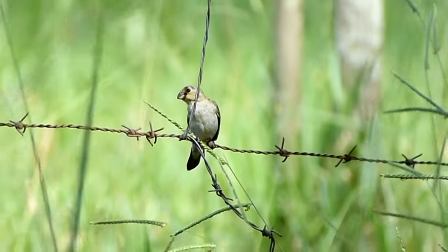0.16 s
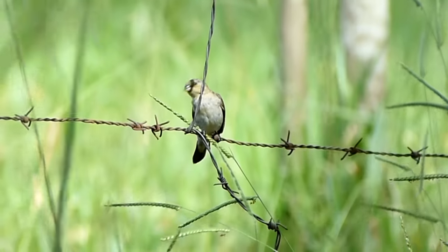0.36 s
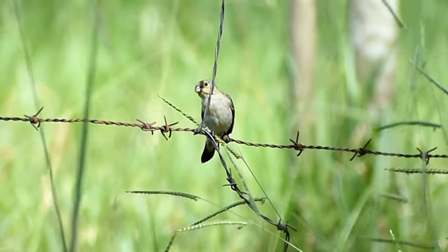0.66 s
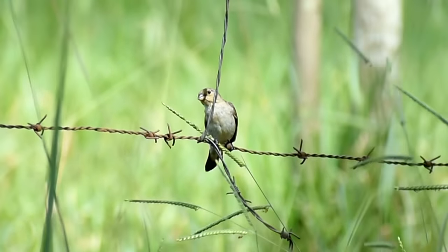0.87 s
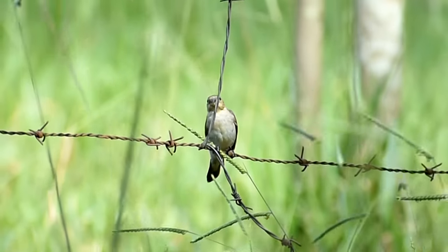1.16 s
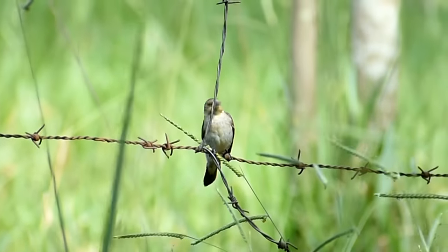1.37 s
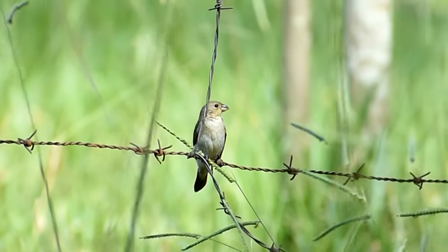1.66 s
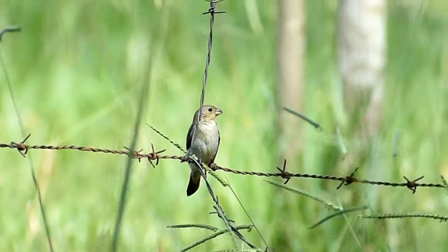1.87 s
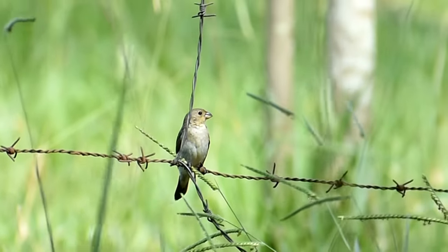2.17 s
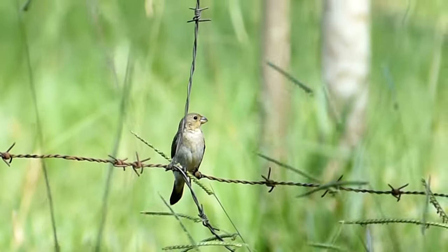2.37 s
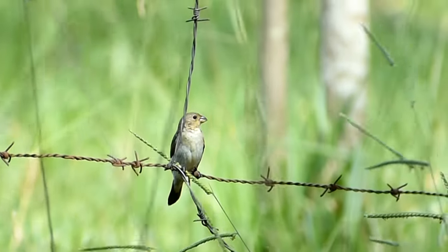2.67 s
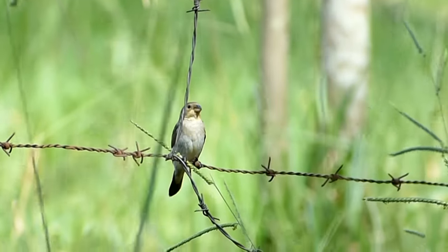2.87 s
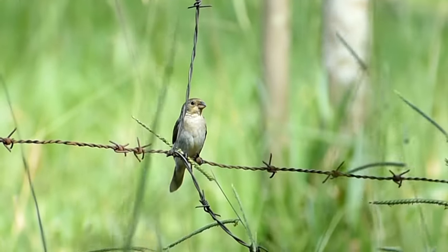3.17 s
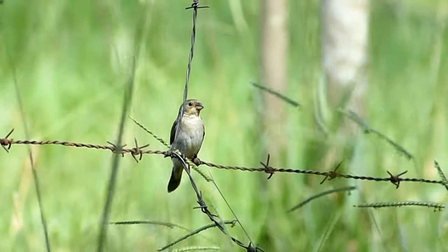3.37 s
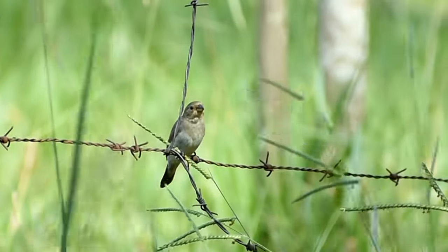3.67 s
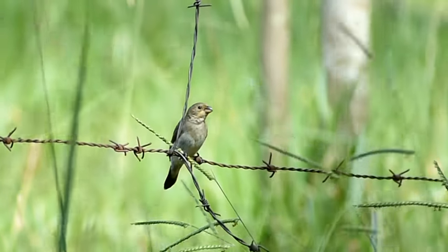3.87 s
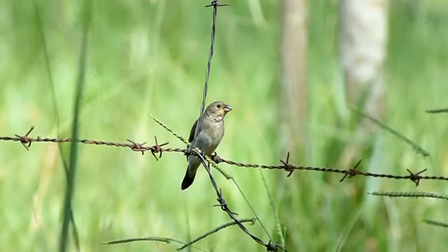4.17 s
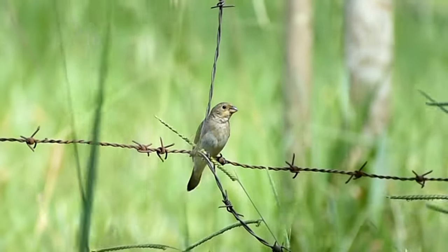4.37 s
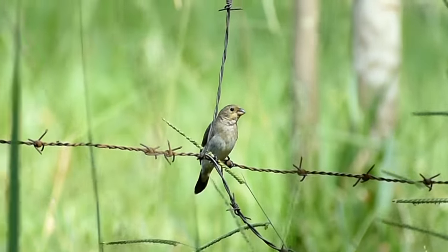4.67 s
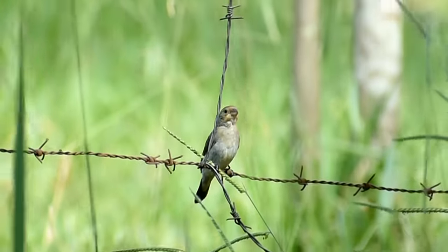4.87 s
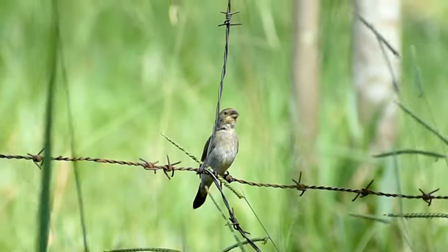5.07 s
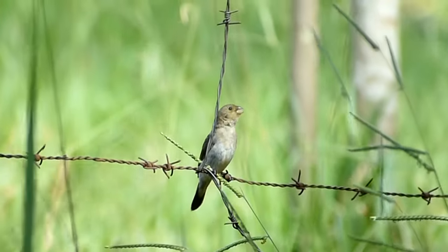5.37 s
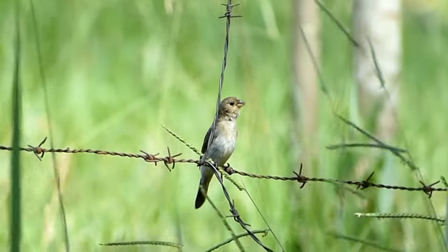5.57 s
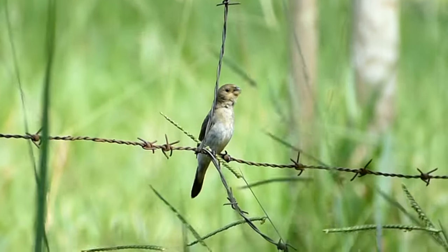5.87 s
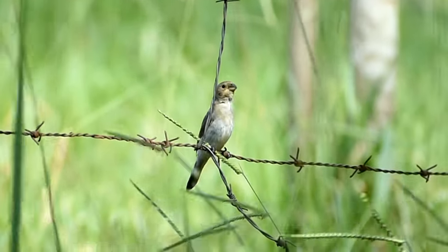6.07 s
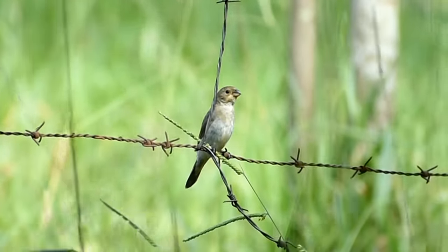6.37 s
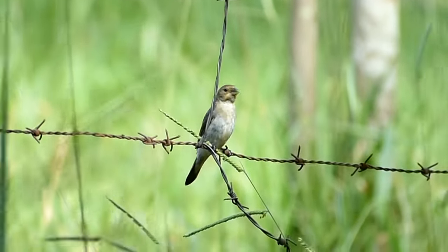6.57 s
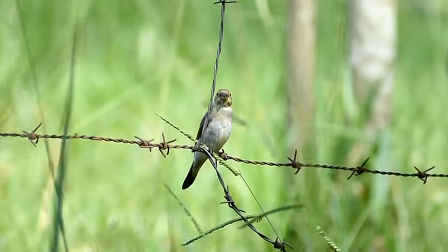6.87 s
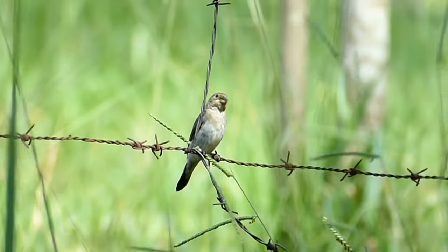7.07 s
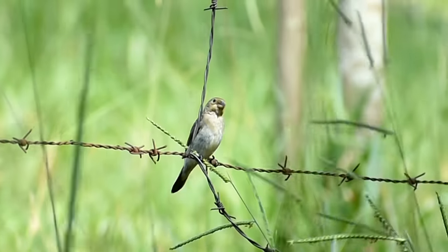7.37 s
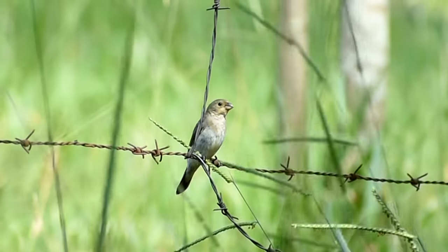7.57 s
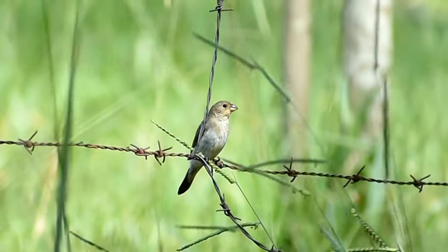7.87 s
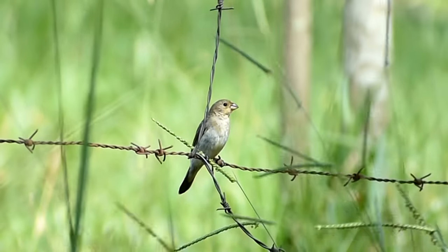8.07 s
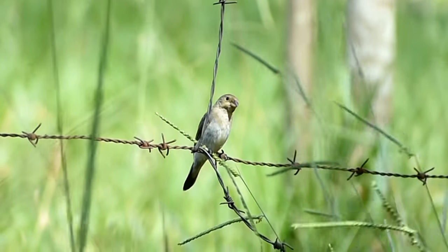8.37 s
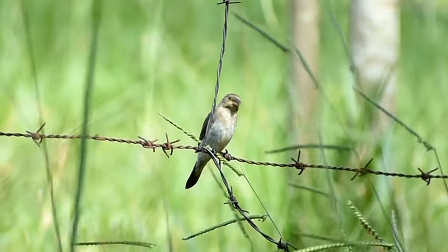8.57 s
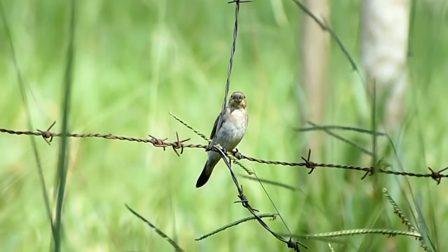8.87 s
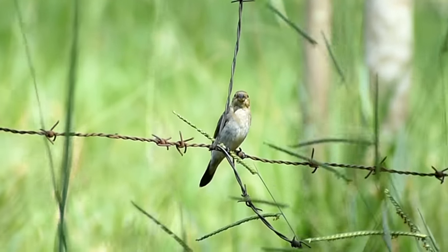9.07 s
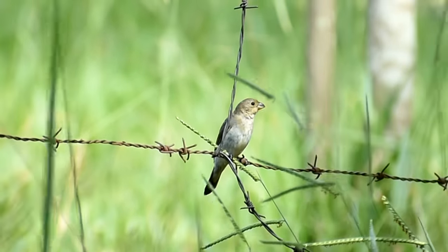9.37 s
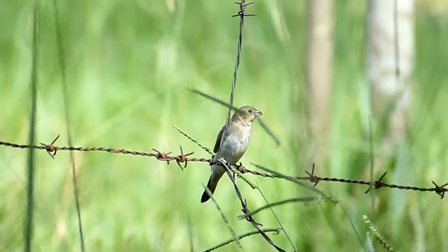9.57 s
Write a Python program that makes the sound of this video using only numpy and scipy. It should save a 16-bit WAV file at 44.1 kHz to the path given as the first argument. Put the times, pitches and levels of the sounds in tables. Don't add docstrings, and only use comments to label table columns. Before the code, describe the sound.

Open grassland: short nasal bird notes, dry clicks and frog pips, then one bright rapid trill, cricket chirping and thin katydid ticks.

```python
import sys
import numpy as np
from scipy import signal
from scipy.fft import rfft, irfft, next_fast_len
from scipy.io import wavfile
from scipy.ndimage import uniform_filter1d, map_coordinates

SR = 44100
rng = np.random.default_rng(int(sys.argv[2]) if len(sys.argv) > 2 else 0)


def inscribe(sig):
    pcm = np.round(np.clip(np.atleast_2d(sig).T, -1, 1) * 32767)
    wavfile.write(sys.argv[1], SR, pcm.astype(np.int16))


def rack_gain(trim_db):
    fader = np.asarray(trim_db, float)
    return 10 ** (fader / 20)


N = 428211

# (start [s], first pitch [Hz], fall time [s], upward flick [Hz], level [dB])
TRILL = [(5.054, 4500, 0.032, 50, -48.5), (5.112, 4360, .035, 200, -52), (5.196, 4540, 0.027, 50, -35.5),
         (5.254, 4400, 0.041, 200, -41.5), (5.342, 4620, .026, 50, -32.5), (5.396, 4620, 0.041, 250, -37.5),
         (5.493, 4570, 0.024, 50, -28.5), (5.545, 4490, 0.042, 248, -32.5), (5.649, 4580, 0.026, 50, -28),
         (5.703, 4590, .045, 250, -31.5), (5.807, 4620, .03, 100, -28), (5.888, 4740, 0.038, 607, -29),
         (5.955, 4670, 0.043, 573, -28.5), (6.031, 4680, 0.04, 710, -27.5),
         (6.091, 4600, 0.044, 495, -30.5)]
# (start [s], level [dB])
STUTTER = [(5.187, -46), (5.331, -45), (5.335, -38), (5.47, -48), (5.478, -42), (5.485, -32.5),
           (5.631, -38), (5.64, -29), (5.782, -42), (5.79, -33.5), (5.8, -34)]
# (centre [Hz], width [Hz], level [dB])
BEAK_MODES = [(3263, 160, 1.5), (3760, 123, 3), (3980, 190, -1.5), (4270, 240, 1), (4850, 490, -6)]
# (delay [s], level [dB])
POST_ECHOES = [
    (.0075, -18),
    (0.0153, -24),
    (0.025, -16),
]

# (start [s], length [s], top pitch [Hz], level [dB], pitch sag at the ends [share])
NASAL_CALLS = [(0.446, 0.077, 747, -46, 0.012), (1.048, 0.083, 711, -49, 0.058),
               (1.323, 0.074, 710, -47, 0.065), (1.544, 0.066, 652, -51, 0.059),
               (1.79, 0.081, 725, -50, 0.13), (2.015, 0.058, 735.5, -35, 0.13),
               (2.211, 0.077, 712, -41.5, 0.17), (2.499, 0.093, 694, -47, 0.092),
               (2.709, 0.081, 709, -46.5, .07), (2.952, 0.097, 681, -46, 0.083),
               (3.187, 0.087, 692, -42.5, 0.093), (3.428, .19, 698, -47, 0.04),
               (3.581, 0.14, 680, -48.5, 0.029), (3.7, 0.098, 688, -42.5, 0.031),
               (3.952, 0.086, 678, -47.5, 0.031), (5.04, 0.06, 690, -52, 0.032)]
# (mouth resonance [Hz], moment of the top [share], roughness [0-1])
NASAL_MANNER = [(4060, .55, .3), (3200, .55, .5), (3300, .55, .4), (3200, .55, .5), (2900, .6, .55),
                (3250, .66, .05), (3400, .72, .1), (3380, .6, .6), (2900, .5, .4), (3300, .55, .55),
                (3740, .6, .35), (3900, .3, .4), (3500, .5, .5), (3800, .35, .45), (3800, .5, .45),
                (3500, .55, .55)]
# (frequency [Hz], level [dB])
THROAT = [(1500, -60), (2400, -10), (2900, 5.5), (3600, 0.5), (4300, 1), (5200, 2.5), (6600, -5),
          (8000, -33), (10000, -73), (14000, -79)]
# (start [s], length [s], first pitch [Hz], level [dB])
CHURR = [
    (0.518, 0.057, 3440, -45),
    (0.57, 0.064, 3230, -45.5),
    (0.637, .03, 2954, -44),
    (.662, .032, 2900, -39.5),
    (0.704, 0.05, 3020, -49),
]
# (multiple of the pulse rate, level [dB])
CHURR_PARTIALS = [(3, 7), (4, -13), (5, -9), (6, -11), (7, -25), (8, -25)]
# (frequency [Hz], density [dB per Hz])
SPRAY_SPECTRUM = [(2240, -7), (3800, -1), (4860, -3.5), (5270, -4), (7350, -8), (9070, -28), (10000, -26),
                  (13000, -53), (22000, -120)]
SPRAY_TIMES = (.49, .54, .66, .76)

# (time from start [s], pitch [Hz], level [dB])
SLIDE_HIGH = [(0, 9900, -11), (0.024, 8050, -3), (.034, 7830, 1.5), (.054, 7000, 1), (.068, 7250, -4),
              (.092, 6500, -1)]
SLIDE_LOW = [(0, 8170, 1), (.02, 6840, -3.5), (.036, 6740, -9), (.052, 6300, 9)]
# (start [s], delay of low voice [s], high level [dB], low level [dB])
SLIDES = [
    (0.402, 0, -51, -50.5),
    (5.648, .006, -57, -50.5),
    (6.822, 0.013, -57, -50),
]
# (start [s], length [s], first pitch [Hz], last pitch [Hz], level [dB])
GLIDES = [
    (.045, .08, 5390, 4260, -61),
    (.895, 0.063, 5400, 4250, -57),
    (2.47, 0.054, 7400, 7750, -63),
    (3.57, 0.067, 6450, 6950, -53.5),
    (.634, 0.026, 7660, 7550, -54),
    (1.544, .016, 4000, 4550, -53),
    (6.125, .03, 7550, 7400, -64),
]
# (start [s], length [s], pitch at the ends [Hz], pitch halfway [Hz], level [dB])
BOWS = [
    (4.16, 0.083, 4270, 4600, -58.5),
    (6.037, 0.084, 7500, 6950, -54.5),
]

# (from [s], to [s], level [dB])
DEEP_FROG_BOUTS = [
    (0, 3.5, -58),
    (.38, 0.478, -48),
    (1.44, 1.71, -56),
    (1.72, 1.92, -51.5),
    (2.38, 2.45, -62),
    (4.55, 5.1, -61),
    (5.15, 6.2, -59),
    (5.2, 5.4, -53.5),
    (5.8, 5.95, -53),
]
LOW_FROG_BOUTS = [
    (0, 0.37, -53),
    (.5, 3.1, -59),
    (3.18, 3.3, -49),
    (4.5, 4.67, -56),
    (4.68, 4.8, -57),
    (4.82, 5.06, -57),
    (5.06, 5.15, -60),
    (5.15, 6.15, -54),
    (6.19, 9.3, -44.5),
]
HIGH_FROG_BOUTS = [
    (0, .4, -53.5),
    (.45, 1, -55),
    (1, 2.5, -55),
    (2.5, 2.68, -51),
    (2.68, 2.9, -53),
    (2.9, 3.3, -55),
    (4.6, 5.1, -65.5),
    (5.12, 5.75, -51.5),
    (5.75, 6.3, -49.5),
]
NEAR_CRICKET_BOUTS = [
    (4.1, 4.26, -59),
    (4.85, 4.96, -53.5),
    (4.96, 5.04, -51),
    (5.08, 6.3, -55),
    (6.3, 6.65, -57),
    (6.65, 6.9, -53),
    (6.93, 7.14, -46.5),
    (7.14, 7.25, -47),
]
FAR_CRICKET_BOUTS = [
    (4.4, 4.6, -77),
    (4.68, 4.82, -59),
    (4.82, 5.1, -58),
    (5.1, 6.3, -53.5),
    (6.3, 6.62, -57.5),
    (6.62, 7.18, -51),
]
# (time [s], peak [dB], pitch [Hz])
SHARP_PIPS = [(0.2119, -36, 2300), (0.2443, -33, 2400), (0.3027, -36, 2400), (0.3845, -35, 2150),
              (0.4564, -32, 2080), (0.5252, -37, 2480), (1.7434, -31, 2120), (1.7784, -33.5, 2220),
              (1.8253, -34, 2210), (1.8721, -29, 2100), (2.1066, -53, 2480), (2.1525, -37, 2080),
              (2.2243, -33, 2480), (2.3401, -41, 2310), (2.6788, -39, 2500), (2.783, -39, 2520),
              (2.819, -37, 2830),
              (4.5514, -46, 2450), (4.6307, -42.5, 2360), (4.832, -41, 2246), (5.163, -42, 2650),
             (6.206, -39, 2280), (6.2175, -31, 2280), (4.6666, -56, 2240), (4.7005, -41, 2354),
             (4.7371, -43, 2610), (4.8185, -44, 2240), (4.9125, -66, 2160), (4.9564, -36, 2080),
             (5.0143, -39.5, 2420)]
# (time [s], peak [dB], pitch [Hz])
CRICKET_PIPS = [(4.9184, -50, 3290), (4.9287, -52, 3430), (4.9551, -52, 3420), (6.6139, -57, 3500),
                (6.6493, -50, 3660), (6.6817, -59, 3750), (6.6917, -47, 3370), (6.7321, -45, 3610),
                (6.7825, -49, 3220), (6.795, -51, 3670), (6.8059, -39, 3760), (6.8284, -47, 3500),
                (6.8523, -40, 3500), (6.9466, -44, 3380), (6.978, -52, 3400), (7.006, -47, 3550),
                (7.0354, -45, 3560), (7.0599, -39, 3500)]
FAR_PIPS = [
    (4.6104, -61, 4290),
    (4.6303, -65, 4610),
    (4.6742, -51, 4560),
    (4.7056, -49, 4400),
    (4.7151, -46, 4550),
    (4.753, -69, 4580),
    (4.775, -48, 4570),
    (4.7999, -60, 4380),
    (4.8578, -59, 4270),
]
FROG_PIPS = [
    (1.2431, -39, 2070),
    (1.3009, -38, 2110),
    (2.4678, -57, 2450),
    (2.5247, -47, 2920),
    (2.5636, -33.5, 2970),
    (2.711, -36, 2430),
    (2.8195, -38, 3000),
    (2.9502, -39, 2830),
]

# (time [s], peak [dB], main mode [Hz], overtones [dB], length [s])
KATYDID_TICKS = [(7.603, -43, 8200, -7.5, 0.024), (7.93, -42.5, 8550, -26, 0.042),
                 (8.205, -42.5, 8630, -16, 0.056), (8.474, -42, 8650, -13, 0.057),
                 (8.743, -41, 8650, -13, 0.041), (8.878, -47, 8440, -9.5, 0.032),
                 (8.986, -56, 8340, -8, 0.035), (9.044, -44, 8700, -4, 0.052),
                 (9.21, -31, 8700, -16, 0.019), (9.323, -43, 8850, -1, 0.049), (9.37, -48, 8180, -2, 0.039),
                 (9.494, -39, 8700, -3, 0.061), (9.587, -45, 8660, -2, 0.095)]
# (frequency [Hz], level [dB])
WING_MODES = [(11300, 4), (12500, 1.5), (13500, -3), (14600, -4), (15300, -11)]
# (time [s], peak [dB], bright part [dB])
SNAPS = [
    (0.8574, -23.5, -27),
    (1.252, -24, -22),
    (2.8194, -35, -30),
    (3.4444, -25, -30),
    (4.8578, -28, -22),
    (7.9228, -48, -14),
    (8.9944, -48, -24),
    (9.1904, -41, -28),
]

# (frequency [Hz], density [dB per Hz])
LOW_SPECTRUM = [(71, -79), (120, -63), (138, -37.5), (205, -11), (268, 1), (489, -8), (520, -5.5),
                (680, -27), (1140, -120)]
DRONE_SPECTRUM = [(310, -67.5), (520, -15), (567, -7.5), (650, -6.5), (820, -9), (1070, -18.5),
                  (1800, -120)]
MID_SPECTRUM = [(480, -42), (820, -6.5), (930, -3.5), (1210, 0.5), (1500, -7.5), (1910, -12.5), (1980, -64),
                (2570, -48), (4360, -120)]
# (frequency [Hz], density [dB per Hz])
AIR_SPECTRUM = [(1710, -23.5), (2900, -2.5), (3220, -5.5), (3840, -7.5), (4210, -1.5), (5060, -5.5),
                (7830, -9.5), (8470, -10), (9480, -11), (12700, -15), (15600, -19)]
# (time [s], level [dB])
RUMBLE = [
    (0, -52),
    (.27, -51),
    (.32, -54.5),
    (2, -55),
    (3.2, -54.5),
    (4.6, -54),
    (5.17, -51.5),
    (5.25, -55.5),
    (6.3, -56.5),
]
# (from [s], to [s], level [dB])
GUST = [
    (5.03, 5.16, -57.5),
]
# (frequency [Hz], correlation [0-1])
LIKENESS = [(200, 1), (500, 0.99), (1000, 0.89), (1600, 0.64), (2300, 0.53), (3500, 0.83), (5000, 0.25),
            (8000, 0.067), (12000, 0.041)]
# (frequency [Hz], 60 dB decay time [s])
FIELD_DECAY = [(1000, 0.26), (3000, 0.24), (5000, 0.38), (10000, 0.19)]

# (from [s], to [s])
LOW_REPEATS = [
    (3.246, 3.818),
    (3.818, 4.2267),
    (4.2267, 4.4106),
    (4.4106, 4.5595),
    (6.229, 6.842),
    (6.842, 7.1282),
]
# (from [s], to [s], source [s])
WIDE_REPEATS = [
    (7.1282, 7.8226, 4.2063),
    (7.8226, 8.5593, 4.206),
    (8.5593, 9.357, 4.2061),
    (9.357, 9.72, 4.1875),
]


def finch():
    out, over = np.zeros(N), np.zeros(N)
    note_s, sinks_to_hz = 0.045, 1487
    notes = [(s, hz, fall, flick_hz, note_s, db) for s, hz, fall, flick_hz, db in TRILL]
    notes += [(s, 4790, 0.018, 0, 0.0094, db) for s, db in STUTTER]
    for s, hz, fall, flick_hz, length, db in notes:
        t = np.arange(0, length, 1 / SR)
        pitch = sinks_to_hz + (hz - sinks_to_hz) * np.exp(-t / fall)
        pitch += flick_hz * t / 0.004 * np.exp(1 - t / 0.004)
        pitch -= 1.57 * flick_hz * np.exp(-t / 0.00182)
        pitch -= 280 * (t / note_s) ** 4
        phase = 2 * np.pi * np.cumsum(pitch) / SR
        swell = rack_gain(db + 3.5 + 1.3 * wobble(158, size=SR // 20)[:len(t)])
        swell = swell * np.sin(np.pi * (t / length) ** 0.63) ** 0.5
        swell = swell * (1 - np.clip(flick_hz / 800, 0, 1) * np.exp(-t / 0.003))
        third = rack_gain(-34) * flick_hz / 600 * np.exp(-t / 0.022)
        add(out, round(s * SR), swell * np.sin(phase))
        add(over, round(s * SR), swell * third * np.sin(3 * phase))

    def beak_and_posts(f):
        modes = sum(rack_gain(db) * 1j * f * w / (c * c - f * f + 1j * f * w) for c, w, db in BEAK_MODES)
        small_beak = np.sqrt(1 + (2400 / (f + 1)) ** 14)
        echoes = sum(rack_gain(db) * np.exp(-2j * np.pi * f * s) for s, db in POST_ECHOES)
        return modes / small_beak * (1 + echoes)

    song = filtered(out, beak_and_posts)
    haze = rack_gain(-27) * song * rng.standard_normal(N)
    over += filtered(haze, lambda f: (f > 5000) / np.sqrt(1 + (f / 7000) ** 4))
    bent = rack_gain(-4) * song ** 2 + rack_gain(26) * song ** 3
    return song + over + filtered(bent, lambda f: (f > 6500) * np.minimum(f / 11500, 1) ** 2)


def nasal_bird():
    out, most = np.zeros(N), SR // 5
    breath = filtered(rng.standard_normal(N), lambda f: rack_gain(0.39 * along(THROAT, f)))
    order = np.arange(3, 15)[:, None]
    for (s, length, top_hz, db, sag), (mouth_hz, crest, rough) in zip(NASAL_CALLS, NASAL_MANNER):
        at, n = round(s * SR), round(length * SR)
        bow = np.interp(np.linspace(0, 1, n), [0, crest, 1], [-1, 0, 1])
        hz = top_hz * (1 - sag * bow ** 2) * (1 + 0.03 * rough * wobble(30, size=most)[:n])
        jitter = 1 + 0.016 * rough * wobble(156.7, size=most)[:n]
        phase = 2 * np.pi * np.cumsum(hz * jitter) / SR
        colour_db = along(THROAT, order * hz) - 5 * np.log2(order * hz / 3500)
        colour_db += 5 * np.exp(-(np.log2(order * hz / mouth_hz) / 0.3) ** 2)
        flutter_db = 7 * rough * np.array([wobble(65.5, size=most)[:n] for _ in order])
        clear_db = colour_db + flutter_db - 6 * np.log2(order / 5)
        clear = np.sum(rack_gain(clear_db) * np.cos(order * phase), 0)
        smear = np.array([wobble(280, size=most)[:n] for _ in order])
        smeared = np.sum(rack_gain(colour_db) * smear * np.cos(order * phase), 0)
        torn = breath[at:at + n] * (1 + np.cos(phase))
        torn_share = 0.55
        voice = np.sqrt(1 - rough) * unit(clear)
        voice += np.sqrt(rough * torn_share) * unit(torn)
        voice += np.sqrt(rough * (1 - torn_share)) * unit(smeared)
        add(out, at, rack_gain(db) * np.abs(1 - bow ** 2) ** 1.1 * voice)
    return out


def churr():
    out, most = np.zeros(N), SR // 10
    for s, length, hz, db in CHURR:
        t = np.arange(0, length, 1 / SR)
        shake = rack_gain(2.5 * wobble(170, size=most)[:len(t)])
        pitch = (hz - 1580 * t) * (1 + 0.0176 * wobble(216, size=most)[:len(t)])
        phase = 2 * np.pi * np.cumsum(pitch) / SR / CHURR_PARTIALS[0][0]
        stack = sum(rack_gain(level + 3.0 * wobble(68, size=most)[:len(t)]) * np.sin(k * phase)
                    for k, level in CHURR_PARTIALS)
        add(out, round(s * SR), rack_gain(db) * np.sin(np.pi * t / length) ** 0.28 * unit(shake * stack))
    spray = unit(rack_gain(0.98 * wobble(119)) * rush(SPRAY_SPECTRUM, patchy_db=3.0)[0])
    return out + rack_gain(-44) * np.interp(np.arange(N) / SR, SPRAY_TIMES, [0, 1, 1, 0]) * spray


def whistles():
    out, calls = np.zeros(N), []
    for s, later, high_db, low_db in SLIDES:
        for shape, start, level_db in (SLIDE_HIGH, s, high_db), (SLIDE_LOW, s + later, low_db):
            at, (hz, db), ends = stretch(shape, start)
            calls.append((at, hz, ends * rack_gain(level_db + db)))
    for rows, turns in (GLIDES, 1), (BOWS, 2):
        for s, length, first_hz, far_hz, db in rows:
            u = np.linspace(0, 1, round(length * SR))
            hz = first_hz + (far_hz - first_hz) * np.sin(np.pi * turns * u / 2) ** 2
            calls.append((round(s * SR), hz, rack_gain(db) * np.abs(np.sin(np.pi * u)) ** 0.2))
    for at, hz, gain in calls:
        unsteady = rack_gain(1.5 * wobble(120, size=SR // 5)[:len(hz)])
        add(out, at, gain * unsteady * np.sin(2 * np.pi * np.cumsum(hz) / SR))
    return out


def chorus():
    frogs = bouts(DEEP_FROG_BOUTS) * pips(2057, 0.023, 55, 0.0046, 3)
    frogs += bouts(LOW_FROG_BOUTS) * pips(2283, 0.061, 88, 0.0011, 2.2)
    frogs += bouts(HIGH_FROG_BOUTS) * rack_gain(1.2 * wobble(6.7) - 0.5) * pips(2715, 0.1, 300, 0.00076, 4.8)
    t = np.arange(800) / SR
    chirp = [(5.0005 + k * 0.0115, -41 - k * k, 3420) for k in range(-3, 4)]
    for s, db, hz in SHARP_PIPS + chirp:
        ring = (t / 0.0013) * np.exp(-t / 0.0012)
        add(frogs, round(s * SR), rack_gain(db + 8) * ring * np.sin(2 * np.pi * hz * t))
    for s, db, hz in CRICKET_PIPS + FAR_PIPS + FROG_PIPS:
        ring = (t / 0.0031) * np.exp(-t / 0.0027)
        add(frogs, round(s * SR), rack_gain(db + 5.5) * ring * np.sin(2 * np.pi * hz * t))
    near = bouts(NEAR_CRICKET_BOUTS) * rack_gain(1.8 * wobble(14) - 8.0) * pips(3510, 0.07, 85, 0.0021, 1.5)
    far = bouts(FAR_CRICKET_BOUTS) * rack_gain(-4.5) * pips(4030, 0.11, 240, 0.00034, 7.6)
    return frogs + near + far


def katydid():
    out = np.zeros(N)
    for s, db, hz, over_db, length in KATYDID_TICKS:
        t = np.arange(0, length * 2.0, 1 / SR)
        teeth = np.abs(np.sin(np.pi * 190 * t)) ** 0.56 * rack_gain(2.3 * wobble(184, size=len(t)))

        def mode(f):
            return np.sin(2 * np.pi * np.cumsum(f * (1 + 0.022 * wobble(400, size=len(t)))) / SR)

        upper = sum(rack_gain(level + rng.normal(0, 2.6)) * mode(f) for f, level in WING_MODES)
        swell = np.clip(t / 0.008, 0, 1) * np.exp(-(t / length) ** 2)
        wing = mode(hz) + rack_gain(over_db - 11.0) * upper
        add(out, round((s - 0.004) * SR), rack_gain(db - 13.5) * swell * teeth * wing)
    return out


def snaps():
    out, t = np.zeros(N), np.arange(120) / SR
    for s, db, bright_db in SNAPS:
        sharp = rng.standard_normal(len(t)) * np.exp(-t / 0.00029)
        sharp = sharp / np.linalg.norm(sharp)
        dull = uniform_filter1d(sharp, size=4)
        add(out, round(s * SR), rack_gain(db + 6.5) * (dull + rack_gain(bright_db) * sharp))
    return filtered(out, lambda hz: 1 / (1 + (3000 / (hz + 1)) ** 4) / (1 + (hz / 9000) ** 2))


def background():
    low_db, = curves(RUMBLE)
    since = np.arange(N) / SR - 0.282
    engine_power = rack_gain(2 * -52) * np.clip(since / 0.022, 0, 1) * np.exp(-np.abs(since) / 0.64)
    engine_mid_power = rack_gain(2 * -3) * engine_power * np.exp(-np.abs(since) / 1.4)
    drone = np.sqrt(rack_gain(2 * -59.5) + engine_power)
    mid = np.sqrt(rack_gain(2 * -59) + engine_mid_power + bouts(GUST) ** 2)
    hum = rack_gain(low_db) * rush(LOW_SPECTRUM, patchy_db=0.5) + drone * rush(DRONE_SPECTRUM, patchy_db=0.5)
    air = rush(AIR_SPECTRUM, patchy_db=0.3)
    return hum + mid * rush(MID_SPECTRUM, patchy_db=1.0) + rack_gain(-57) * air


def field(x, wide):
    hz, t, z = signal.stft(rng.standard_normal((2, SR // 3)), SR, nperseg=128)
    decay = rack_gain(-60 * t / along(FIELD_DECAY, hz)[:, None])
    mid, side = signal.istft(z * decay, SR, nperseg=128)[1]
    tail = np.array([mid + wide * side, mid - wide * side]) / np.linalg.norm(mid)
    return signal.fftconvolve(np.pad(x, (150, 0))[None], tail, axes=1)[:, :N]


def rush(spectrum, patchy_db):
    z = signal.stft(rng.standard_normal((2, N)), nperseg=512)[2]
    patches = uniform_filter1d(rng.standard_normal(z.shape[1:]), 5, 0)
    patches = uniform_filter1d(patches, 8, 1)
    pair = signal.istft(z * rack_gain(patchy_db * unit(patches)), nperseg=512)[1][:, :N]

    def mid_and_side(hz):
        angle = np.arccos(np.clip(along(LIKENESS, hz), -1, 1)) / 2
        return rack_gain(along(spectrum, hz)) * [np.cos(angle), np.sin(angle)]

    mid, side = filtered(pair, mid_and_side)
    return unit(np.array([mid + side, mid - side]))


def pips(hz, spread, rate, life, scatter_db):
    draw = rng.random((6000, 3))
    at = (np.cumsum(0.5 + draw[:, 0]) / rate * SR).astype(int)
    keep = at < N
    t = np.arange(800) / SR
    pitch = hz * (1 + spread * (2 * draw[keep, 1:2] - 1))
    size = rack_gain(-scatter_db * np.log(draw[keep, 2:3] + 0.1))
    burst = size * np.sin(2 * np.pi * pitch * t) * (t / life) * np.exp(-t / life)
    where = at[keep, None] + np.arange(len(t))
    return unit(np.bincount(where.ravel(), burst.ravel(), N + len(t))[:N])


def bouts(rows):
    t = np.arange(N) / SR
    return sum(rack_gain(db) * np.clip(np.minimum(t - a, b - t) / 0.033 + 0.5, 0, 1) for a, b, db in rows)


def stretch(rows, start=0):
    s, *cols = np.transpose(rows)
    t = np.arange(s[0], s[-1], 1 / SR)
    ends = np.clip(np.minimum(t - s[0], s[-1] - t) / 0.008, 0, 1)
    return round((start + s[0]) * SR), [np.interp(t, s, c) for c in cols], ends


def curves(rows):
    s, *cols = np.transpose(rows)
    return [np.interp(np.arange(N) / SR, s, c) for c in cols]


def along(points, hz):
    f, v = np.transpose(points)
    return np.interp(np.log(hz + 1), np.log(f + 1), v)


def wobble(rate, size=N):
    knots = rng.standard_normal(int(size * rate / SR) + 4)
    return unit(map_coordinates(knots, [np.arange(size) * rate / SR]))


def filtered(x, response):
    m = next_fast_len(N + SR // 2)
    return irfft(rfft(x, m) * response(np.fft.rfftfreq(m, 1 / SR)), m)[..., :N]


def unit(x):
    return x / np.sqrt(np.mean(x ** 2) + 1e-20)


def add(track, at, x):
    track[at:at + len(x)] += x[:N - at]


def scene():
    near, other, far, insects = finch(), nasal_bird() + churr(), whistles(), chorus()
    voices = near + rack_gain(-7.5) * field(near, wide=0.24)
    voices += other + rack_gain(-4) * field(other, wide=0.41)
    voices += far + rack_gain(-5.0) * field(far, wide=0.43)
    voices += 0.86 * insects + rack_gain(-5.5) * field(insects, wide=0.28)
    voices = filtered(voices, lambda hz: 1 / (1 + (2010 / (hz + 1)) ** 60))
    tick = katydid()
    tick = tick + rack_gain(-7) * field(tick, wide=0.5)
    return voices + tick + snaps() + background()


def repeated(x, top_hz, pieces):
    band = filtered(x, lambda hz: (hz >= 0) & (hz < top_hz))
    new = band.copy()
    for start, end, source in pieces:
        where = np.arange(round(start * SR), min(round(end * SR), N))
        new[:, where] = band[:, where - where[0] + round(source * SR)]
    return x - band + new


def top_cut(x):
    return signal.sosfilt(signal.butter(12, 15780, fs=SR, output="sos"), x)


def record(dry):
    ports = dry * rack_gain([[0.25], [-0.25]])
    x = filtered(ports, lambda hz: 1 / (1 + (120 / (hz + 1)) ** 4))
    x = filtered(x, lambda hz: 1 - 0.71 * np.exp(-((hz - 3894) / 71.5) ** 2))
    x = repeated(x, 3150, [(a, b, 4.5595) for a, b in LOW_REPEATS])
    x = repeated(x, 7900, WIDE_REPEATS)
    return top_cut(x)


dry = scene()
out = record(dry)
inscribe(out)
```